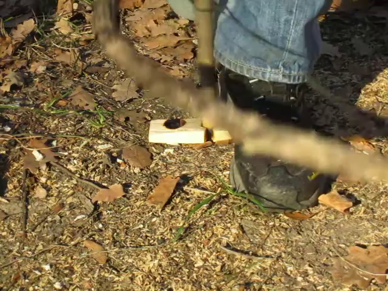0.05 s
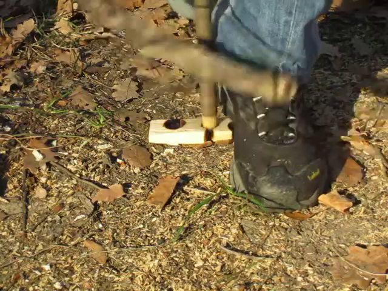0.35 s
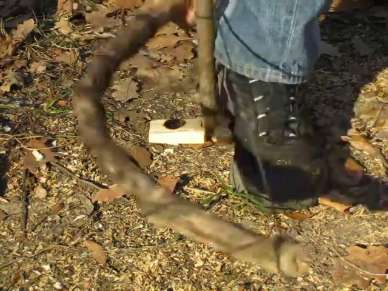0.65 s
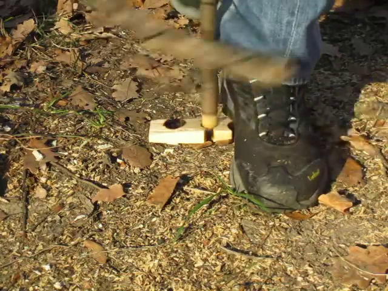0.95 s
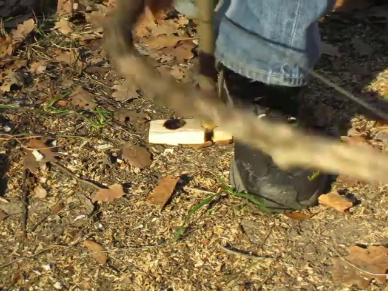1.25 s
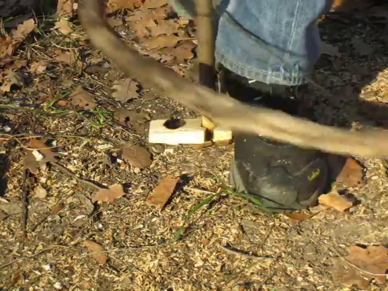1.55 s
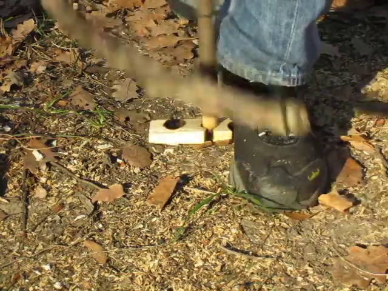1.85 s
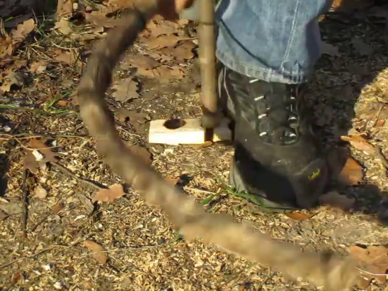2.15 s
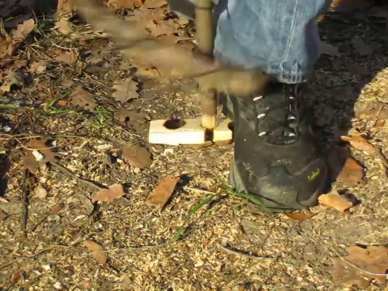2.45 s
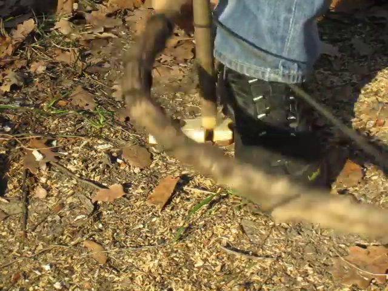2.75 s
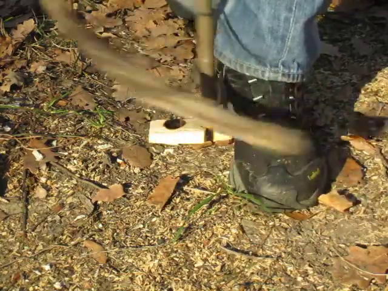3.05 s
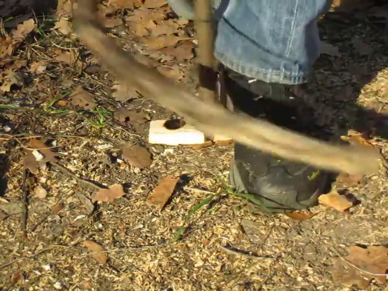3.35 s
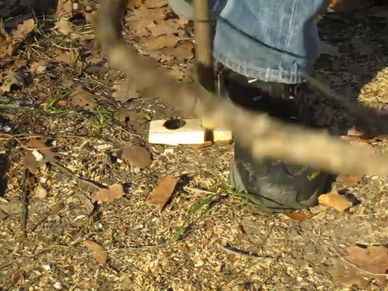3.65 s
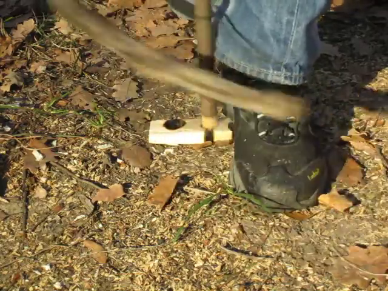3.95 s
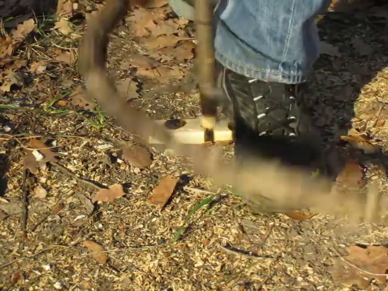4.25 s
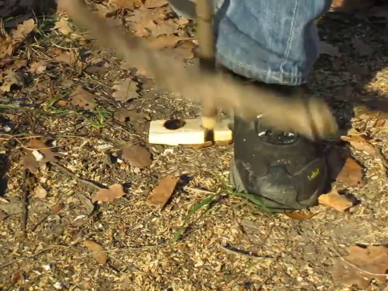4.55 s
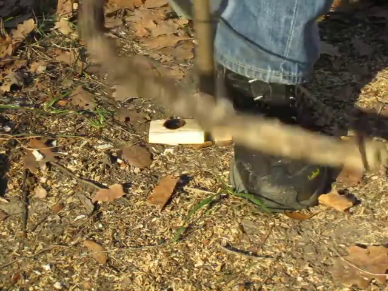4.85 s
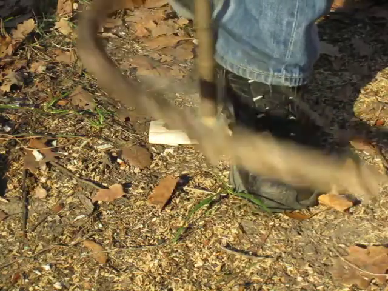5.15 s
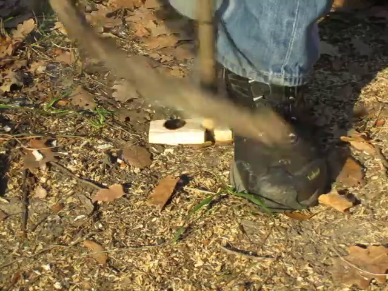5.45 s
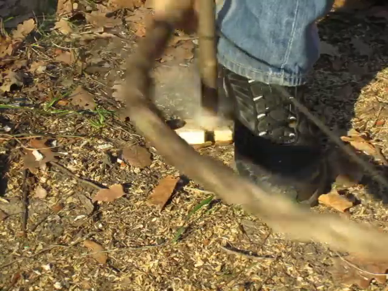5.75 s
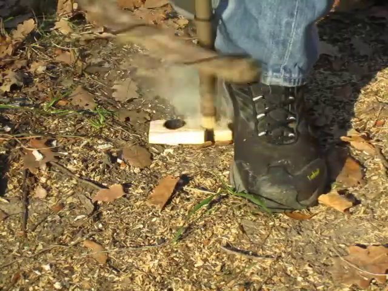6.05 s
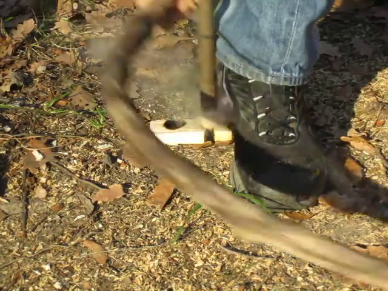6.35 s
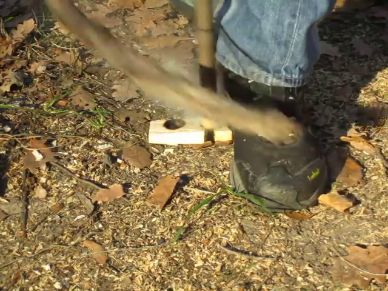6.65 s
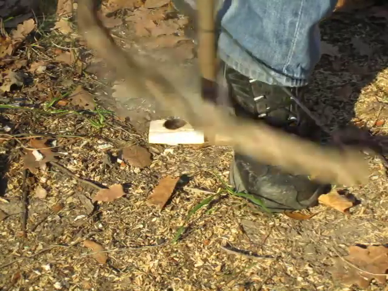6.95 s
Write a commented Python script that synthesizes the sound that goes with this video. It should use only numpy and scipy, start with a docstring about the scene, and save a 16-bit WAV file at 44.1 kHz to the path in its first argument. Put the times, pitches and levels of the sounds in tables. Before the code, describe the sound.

A bow drill runs throughout, heard close up outdoors over soft air and a faint distant rumble. The wooden spindle rubs back and forth in its board at about three strokes a second, quickening to about four. Each stroke is a swell of dry hiss with a rapid rattle of three to six small wooden knocks. Clusters of short, high squeaks ride on the knocks, loudest near 0.1, 0.9 and 1.6 seconds, fainter near 0.5 and 2.3. The cord scrapes faintly a few times in the first three seconds. After a slightly quieter stretch around 3 seconds, squeaks return near 3.7, 4.3 and, weakly, 4.9, then stop. From about 3.7 seconds low thuds and a rough drone grow under the rubbing. The bow ticks now and then, most clearly near 4.4 and 5 seconds. The last two seconds are fast rasping with soft thuds and fewer hard knocks.

```python
"""Outdoors on leafy ground, the microphone close to a bow drill on a fireboard; the strokes get faster.
The spindle hisses in its socket and, at speed, catches about once a turn: each catch knocks the board
and, while the wood is still cool, squeaks as it slips free. Later the catches soften into low thuds.
Bow and cord tick and scrape now and then; behind it all lie distant rumble and soft air."""
import sys
import numpy as np
from scipy import signal
from scipy.fft import rfft, irfft, next_fast_len
from scipy.io import wavfile
from scipy.ndimage import map_coordinates

SR = 44100
rng = np.random.default_rng(int(sys.argv[2]) if len(sys.argv) > 2 else 0)


def bounce(signal):
    """Save signal as a 16-bit WAV file at the path given by the first command-line argument."""
    frames = np.transpose(np.atleast_2d(signal))
    limited = np.clip(frames, -1, 1)
    pcm = np.round(limited * 32767).astype(np.int16)
    wavfile.write(sys.argv[1], SR, pcm)


N = 309582
TIME = np.arange(N) / SR

# Bow strokes, push and pull in turn. Each row: start, top speed and end in seconds, hiss in relative dB,
# number of catches, one spindle turn in seconds, slowing per turn as a share, hardest catch in turns
# after top speed, its knock in relative dB, fall of the other knocks in dB per turn squared.
BOW_STROKES = [(-.12, 0.1094, 0.28, -43.5, 5, 0.041, -0.0099, 0.33, -24.5, 1.0),
               (.23, 0.4784, 0.61, -42.5, 4, 0.031, .024, -0.36, -24, 2.5),
               (0.688, .8640, 1.02, -43, 5, 0.036, 0.026, 0.023, -23.5, 1.64),
               (1.034, 1.21, 1.357, -41.5, 4, 0.03, 0.042, -0.13, -26, 4.5),
               (1.383, 1.5757, 1.697, -43, 5, .0342, 0.055, -0.18, -23.5, 2.5),
               (1.69, 1.9312, 2.07, -43.5, 4, 0.034, 0.012, -0.28, -25, 5.0),
               (2.105, 2.304, 2.47, -44.7, 5, 0.037, -0.011, 0.37, -25, 1.9),
               (2.417, 2.6664, 2.794, -45.5, 4, 0.031, 0.016, -.4, -25.6, 2.5),
               (2.83, 3.0265, 3.194, -47.5, 3, 0.04, 0.091, -1.66, -27, 1.8),
               (3.08, 3.3791, 3.51, -46.5, 4, 0.033, 0.0032, -0.38, -27, 2.4),
               (3.543, 3.7227, 3.86, -44.4, 4, .0283, 0.0098, -0.002, -23.5, 2.25),
               (3.81, 4.0264, 4.156, -44, 5, 0.027, .022, -0.77, -25, 0.94),
               (4.137, 4.346, 4.455, -45, 3, .0276, .033, -0.27, -24.5, 3.5),
               (4.483, 4.6060, 4.741, -42.5, 5, 0.026, 0.028, -1.2, -25.5, 1.0),
               (4.708, 4.892, 5.03, -46.3, 4, 0.025, 0.024, 0.72, -26.3, 6),
               (5, 5.1573, 5.276, -41.5, 5, .0239, .046, -.8, -26.5, 2.5),
               (5.223, 5.4408, 5.55, -44, 5, 0.027, 0.0063, 0.22, -32.5, 13),
               (5.524, 5.691, 5.8, -42, 6, 0.025, -0.032, -0.27, -29, 2.5),
               (5.784, 5.9675, 6.071, -45, 5, 0.025, .005, 0.76, -38.5, 8),
               (6.083, 6.1954, 6.37, -43.5, 5, 0.023, -0.052, 0.85, -24, 2.0),
               (6.324, 6.4623, 6.59, -44.5, 4, 0.027, .03, -.1, -49.5, 4),
               (6.56, 6.7200, 6.85, -40.5, 5, 0.021, 0.073, 0.24, -26, 5.5),
               (6.816, 6.9648, 7.09, -44.5, 5, .025, -.031, 0.16, -45.5, 1.2)]
# Modes of board and spindle; push and pull bear on opposite walls of the socket.
# Each row: frequency in Hz, width in Hz, gain on the push in dB, gain on the pull in dB.
WOOD_MODES = [(365.4, 148, -6, 0.5), (636, 235, -3, -4.5), (847, 218, 0, 1), (1208, 377, 3.5, 2.5),
              (1528, 220, -14.5, 0.5), (1782, 440, 3.5, -2.5), (2194, 600, -23, -9), (2300, 280, -2.5, -6),
              (2956, 600, -0.5, -4.5), (3250, 590, -4.5, -28), (4080, 1050, -5, -5.5),
              (5214, 290, -9.5, -13.5), (5820, 1870, -16.5, -19)]
# The board's low sounds grow once the drilling is harder.
# Each row: time in seconds, thud in relative dB, drone in relative dB.
BOARD_LOWS = [(0, -38, -54), (1.6, -38.5, -68), (2.6, -40.5, -55), (3.35, -41, -61), (3.7, -32, -52),
              (4.3, -32.5, -44), (5, -31.5, -48), (5.8, -35, -45.5), (7, -33, -44)]
# Spectrum of the friction on a pull. Each row: frequency in Hz, gain in dB.
PULL_SPECTRUM = [(300, -1), (800, -12), (1500, -23.5), (2300, -12), (2900, -6), (3500, -3), (4400, -1.5),
                 (5200, 1), (7000, -4.5), (9500, -11.5), (12000, -17), (16000, -32)]


def undb(db):
    """Decibels to gain."""
    return 10 ** (np.asarray(db) / 20)


def rms(x):
    """Root mean square level."""
    return np.sqrt(np.mean(x ** 2) + 1e-20)


def unit(x):
    """Scale to rms 1."""
    return x / rms(x)


def add(track, start, sound):
    """Mix a sound into a track at a time in seconds."""
    i = max(int(start * SR), 0)
    track[i:i + len(sound)] += sound[:max(N - i, 0)]


def colour(x, points):
    """Filter by a spectrum of (Hz, dB) points."""
    hz, db = np.transpose(points)
    size = next_fast_len(len(x))
    bins_hz = np.arange(size // 2 + 1) * SR / size
    gain = undb(np.interp(np.log(bins_hz + 1), np.log(hz), db))
    return irfft(rfft(x, size) * gain, size)[:len(x)]


def resonate(x, hz, width_hz):
    """A resonance applied twice: it swells for a moment, then rings down."""
    section = np.concatenate(signal.iirpeak(hz, hz / width_hz, fs=SR))
    return signal.sosfilt([section, section], x)


def wander(rate_hz):
    """Smooth random wander with a spread of 1."""
    knots = rng.standard_normal(N // 20)
    return unit(map_coordinates(knots, [TIME * rate_hz], order=1))


def grit(count, spread_db):
    """Noise of countless tiny slips of unequal size."""
    return unit(rng.standard_normal(count) * undb(spread_db * rng.standard_normal(count)))


def outdoor_air(level_db=-48, waver_db=0.63):
    """Distant rumble and soft air, well behind the drill."""
    # Spectrum of the background. Each row: frequency in Hz, gain in dB.
    air_spectrum = [(15, -20), (35, -5.5), (58, 2), (85, -7), (130, -7.5), (250, -16), (500, -15),
                    (900, -17.5), (1500, -21), (2600, -26.5), (5000, -31), (9000, -39), (16000, -47.5)]
    return undb(level_db + waver_db * wander(27)) * unit(colour(rng.standard_normal(N), air_spectrum))


def catches(stretch=.014, hard_db=-24, dulling=0.67, thud_fall_db=2.42):
    """The tip catches once a turn near top speed, softer and duller away from the hardest catch.
    Yields time in seconds, stroke number, then knock, brightness and thud in relative dB."""
    # Light early catches as the cord grips on a pull. Each row: time in seconds, knock in relative dB.
    cord_grabs = [(0.3685, -42.5), (1.098, -42), (1.8225, -47.5), (2.5612, -38.5), (3.921, -43)]
    times, thud_levels, _ = np.transpose(BOARD_LOWS)
    for stroke, (_, top, _, _, count, turn_s, slowing, hardest, db, fall_db) in enumerate(BOW_STROKES):
        bright_db, rock_db = (5.5, -1.5) if stroke % 2 else (-2, 0)  # a pull is brighter and rocks less
        for turn in np.arange(count) - (count - 1) / 2:
            time = top + turn_s * turn * (1 + slowing * turn + stretch * turn ** 2)
            knock_db = db - fall_db * (turn - hardest) ** 2
            thud_db = np.interp(top, times, thud_levels) + rock_db - thud_fall_db * turn ** 2
            yield time, stroke, knock_db, bright_db - dulling * (hard_db - knock_db), thud_db
    for time, knock_db in cord_grabs:
        stroke = sum(row[0] < time for row in BOW_STROKES) - 1
        yield time, stroke, knock_db, -6, knock_db - 12  # dull, with little thud


def near_catches(width_s, lead_s):
    """A smooth bump lead_s ahead of each catch."""
    bumps, t = np.zeros(N), TIME[:SR // 20] - 1 / 40
    for start, *_ in catches():
        add(bumps, start - lead_s + t[0], np.exp(-(t / width_s) ** 2))
    return bumps


def tip_pressure(swell_db=3, sag_db=-2.0):
    """The lopsided tip bears hardest at each catch and lifts a little after it."""
    swell = near_catches(width_s=0.0031, lead_s=0.00037)
    sag = near_catches(width_s=0.0053, lead_s=-0.012)
    return undb(swell_db * swell + sag_db * sag)


def fibre_rasp(spectrum, grit_db=4, flicker_db=1.94):
    """Fibre noise whose bands flare up on their own as different spots of the tip touch."""
    noise, out = colour(grit(N, grit_db), spectrum), 0
    edges_hz = [100, 2400, 3400, 4600, 6100, 7600, 10000, 17000]
    for band in zip(edges_hz, edges_hz[1:]):
        part = signal.sosfiltfilt(signal.butter(3, band, "band", fs=SR, output="sos"), noise)
        out = out + part * undb(flicker_db * wander(130))
    return unit(out)


def ground_bounce(x, lag_s=.000722):
    """The reflection off the ground reaches the microphone a moment later and ripples the treble."""
    return x + .2 * np.roll(x, round(lag_s * SR))


def whistle(pulse_db=6, flicker_db=3):
    """On the push the spindle is on the verge of squeaking: its modes flare up once a turn."""
    upper = unit(resonate(rng.standard_normal(N), hz=3990, width_hz=300))
    lower = unit(resonate(rng.standard_normal(N), hz=2830, width_hz=330))
    flare = undb(pulse_db * near_catches(width_s=0.0024, lead_s=0.0026) + flicker_db * wander(83))
    return (upper + undb(-7) * lower) * flare


def board(force, pushing, bright_db=0, detune=np.ones(len(WOOD_MODES))):
    """A force rings the wood's modes; neighbours move in opposite senses at the socket."""
    out = 0
    for k, (hz, width_hz, push_db, pull_db) in enumerate(WOOD_MODES):
        db = (push_db if pushing else pull_db) + bright_db * np.tanh(np.log2(hz / 2300))
        out = out + (-1) ** k * undb(db) * resonate(force, hz * detune[k], width_hz)
    return out


def rubbing(pushing, hiss_db, judder_db, scrape_db, flutter_db, speed_power):
    """All strokes of one direction: hiss follows the spindle's speed, the drone speed and pressure."""
    # Spectrum of the friction on a push. Each row: frequency in Hz, gain in dB.
    push_spectrum = [(300, 2), (700, -12), (1500, -17), (2300, -9.5), (2850, -22), (3400, -1.5),
                     (3950, -5.5), (4500, -2.5), (5200, -2), (6000, -3.5), (7000, -4.5), (9000, -13.5),
                     (12000, -18), (16000, -34)]
    hiss_gain, drone_gain = np.zeros(N), np.zeros(N)
    times, _, drone_levels = np.transpose(BOARD_LOWS)
    for start, top, end, db, *_ in BOW_STROKES[0 if pushing else 1::2]:
        peak_s = top - 0.0051  # the rubbing peaks just ahead of the middle of the catches
        skew = np.log(.5) / np.log((peak_s - start) / (end - start))
        during = (TIME > start) & (TIME < end)
        progress = (TIME[during] - start) / (end - start)
        speed = np.abs(np.sin(np.pi * progress ** skew))
        hiss_gain[during] += undb(db) * speed ** speed_power
        drone_gain[during] += undb(np.interp(top, times, drone_levels)) * speed ** (speed_power + 1.5)
    contact = tip_pressure() * undb(flutter_db * wander(110))
    hiss = ground_bounce(fibre_rasp(push_spectrum if pushing else PULL_SPECTRUM))
    if pushing:
        hiss = hiss + undb(-7) * whistle()
    scrape = unit(board(grit(N, spread_db=4.9), pushing))
    judder = unit(resonate(grit(N, spread_db=9.6), hz=164, width_hz=74))
    drone = undb(judder_db) * judder + undb(scrape_db) * scrape
    return contact * (undb(hiss_db) * hiss_gain * hiss + drone_gain * drone)


def disperse(x, lag_s):
    """Bending waves in wood: highs arrive first; lag_s scales how far the lows trail."""
    khz = np.arange(len(x) + 1) * SR / (2 * len(x)) / 1000
    phase = 2 * np.pi * lag_s * 1000 * (2 * np.sqrt(khz) - khz / 2)
    return irfft(rfft(x, 2 * len(x)) * np.exp(-1j * phase))[:len(x)]


def knocks(tilt=0.7, rebound=0.4, rebound_s=.0052):
    """Each catch is one hard slip and a dying chatter of small ones; a pull adds one rebound."""
    out, t = np.zeros(N), TIME[:SR // 16]
    # the same bumps of the socket come round on every turn of a stroke
    bumps = rng.standard_normal((len(BOW_STROKES), len(t)))
    for start, stroke, db, bright_db, _ in catches():
        pushing = stroke % 2 == 0
        chatter, fade_s, lag_s = (0.54, 0.0029, 0.00055) if pushing else (0.9, 0.0044, 0.00109)
        slips = .7 * bumps[stroke] + .7 * rng.standard_normal(len(t))
        detune = 1 + .007 * rng.standard_normal(len(WOOD_MODES))
        force = chatter * slips * np.exp(-t / fade_s) / np.sqrt(fade_s * SR / 2)
        force[0] += 1  # the hard slip
        if not pushing:
            force[int(rebound_s * SR * undb(rng.standard_normal()))] += rebound
        force = np.roll(force, SR // 2000)  # room for the highs to arrive early
        knock = disperse(board(force, pushing, tilt * bright_db, detune), lag_s)
        add(out, start - .0008, undb(db) * knock / rms(knock[:SR // 125]))  # level set on the first 8 ms
    return out


def thuds(jolt_s=0.0043, lag_s=0.00296):
    """Every catch also rocks the board on the soft soil."""
    out, t = np.zeros(N), TIME[:SR // 10]
    jolt = np.exp(-t / jolt_s)
    for start, *_, db in catches():
        seating = 1 + .04 * rng.standard_normal(2)
        rock = resonate(jolt, hz=179 * seating[0], width_hz=76)
        clunk = resonate(jolt, hz=400 * seating[1], width_hz=400)
        thud = rock - undb(-5) * clunk
        add(out, start + lag_s, undb(db) * thud / rms(thud[:SR // 50]))
    return out


def squeaks(span_s=0.0335, fall_db=5, growth=1.22, glide=0.0081, scatter=0.0031, jitter=0.074):
    """The slip locks on to a spindle mode, swells, sags a little in pitch and leaves a thin ring."""
    # Spells in which the catches squeak. Each row: loudest moment in seconds, pitch in Hz,
    # peak in relative dB, squeak length at that moment in seconds, lag after the catch in seconds.
    spells = [(.115, 4380, -13, .014, .001), (.466, 3060, -19, 0.0046, 0.0091),
              (.856, 4320, -17, .012, -0.001), (1.225, 2890, -28, .01, 0.00093),
              (1.571, 4213, -13, .008, 0), (2.312, 4070, -22, 0.0089, -0.0017),
              (3.729, 4080, -15.5, 0.0056, -.0015), (4.338, 3980, -20, 0.0094, -0.003),
              (4.905, 3956, -24, 0.0082, -0.0016)]
    out, t = np.zeros(N), TIME[:SR // 4]
    ring = undb(-22) * np.exp(-t / 0.01) + undb(-37) * np.exp(-t / 0.1)
    for start, *_ in catches():
        loudest, hz, db, length_s, lag_s = min(spells, key=lambda row: abs(row[0] - start))
        spans = (start - loudest) / span_s
        if abs(spans) < 2.6:
            length_s *= growth ** spans  # later squeaks of a spell last longer
            progress = np.minimum(t / max(length_s, .002), 1)
            envelope = np.sin(np.pi * progress) ** 2 + progress * ring
            pitch = hz * (1 + scatter * rng.standard_normal())
            bend = 1 + glide * (.5 - progress) + jitter * rng.standard_normal(len(t))
            tone = np.sin(2 * np.pi * np.cumsum(pitch * bend) / SR)
            add(out, start + lag_s, undb(db - fall_db * abs(spans) ** 1.68) * envelope * tone)
    return out


def bow_ticks(fade_s=0.0022):
    """Short dry snaps of the bow and its cord as the bow turns round."""
    # The snaps. Each row: start in seconds, level in relative dB.
    snaps = [(.233, -44), (1.731, -47), (3.18, -48), (3.821, -41.5), (3.849, -41), (4.16, -45.5),
             (4.438, -35.5), (5.004, -33.5)]
    # Spectrum of a snap. Each row: frequency in Hz, gain in dB.
    snap_spectrum = [(150, 4), (700, 9), (1800, -0.5), (4500, 2), (8000, -9), (13000, -21), (16000, -27)]
    out, t = np.zeros(N), TIME[:SR // 30]
    for start, db in snaps:
        snap = unit(colour(rng.standard_normal(len(t)), snap_spectrum))
        add(out, start, undb(db) * snap * np.exp(-t / fade_s))
    return out


def cord_scrapes():
    """Brief gritty hiss of the cord tightening on the spindle."""
    # Pulls taking up the slack. Each row: start in seconds, level at the crest in dB, length in seconds.
    tightenings = [(0.317, -45, 0.068), (1.052, -44, 0.064), (1.8, -63, .05), (2.51, -44, 0.082)]
    out = np.zeros(N)
    for start, db, length_s in tightenings:
        count = int(length_s * SR)
        hiss = unit(colour(grit(count, spread_db=8.2), PULL_SPECTRUM))
        add(out, start, undb(db) * np.hanning(count) * hiss)
    return out


def surroundings(x, wet_db=-27.5, rise_s=0.0014, fade_s=0.023, dull_hz=2600):
    """Ground, boot and trees scatter a faint dull tail back to the microphone."""
    t = TIME[:SR // 3]
    tail = signal.sosfilt(signal.butter(1, dull_hz, fs=SR, output="sos"), rng.standard_normal(len(t)))
    tail = tail * np.exp(-t / fade_s) * (1 - np.exp(-t / rise_s))
    return x + undb(wet_db) * signal.fftconvolve(x, tail / np.linalg.norm(tail))[:N]


def scene():
    """In mono: push and pull strokes with their catches close by, quiet open air behind."""
    push = rubbing(pushing=True, hiss_db=2.2, judder_db=-1.5, scrape_db=-3,
                   flutter_db=1.77, speed_power=1.5)
    pull = rubbing(pushing=False, hiss_db=2.5, judder_db=-1, scrape_db=-1,
                   flutter_db=0.64, speed_power=1.99)
    catching = undb(2.5) * knocks() + undb(-1.5) * thuds() + undb(-3.5) * squeaks()
    drill = push + pull + catching + cord_scrapes() + undb(7.5) * bow_ticks()
    return (surroundings(drill) + outdoor_air())[None]


def record(dry, top_hz=15800):
    """The camera cuts the top off steeply."""
    return signal.sosfilt(signal.ellip(10, .2, 70, top_hz, fs=SR, output="sos"), dry)


dry = scene()
out = record(dry)
bounce(out)
```